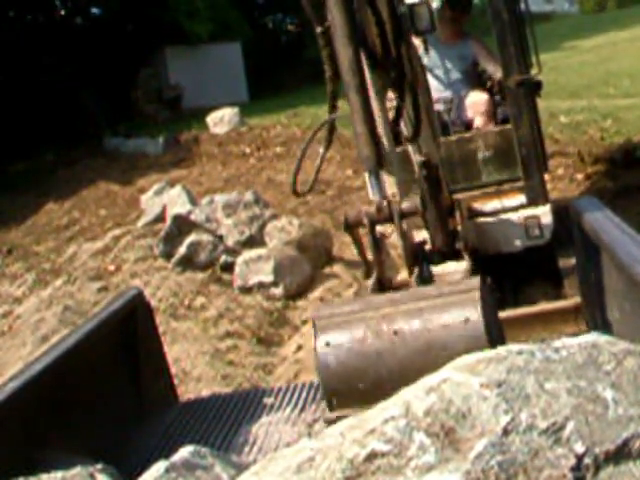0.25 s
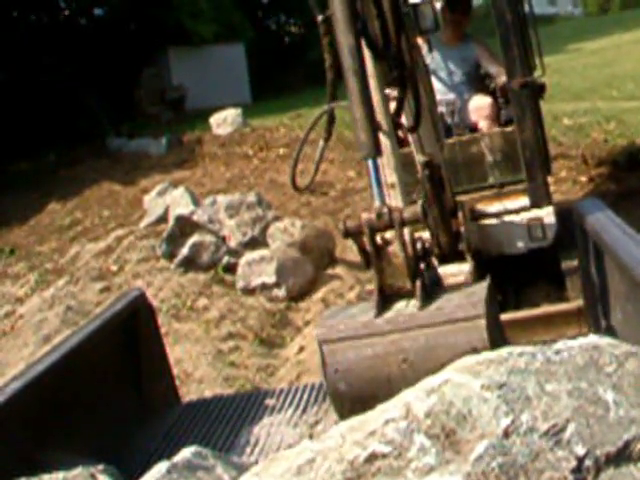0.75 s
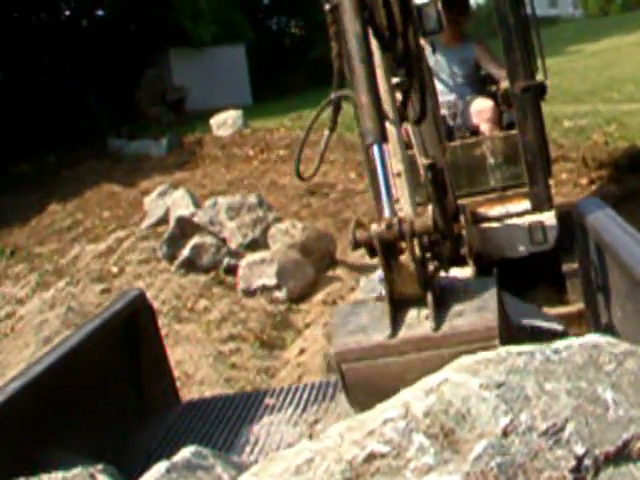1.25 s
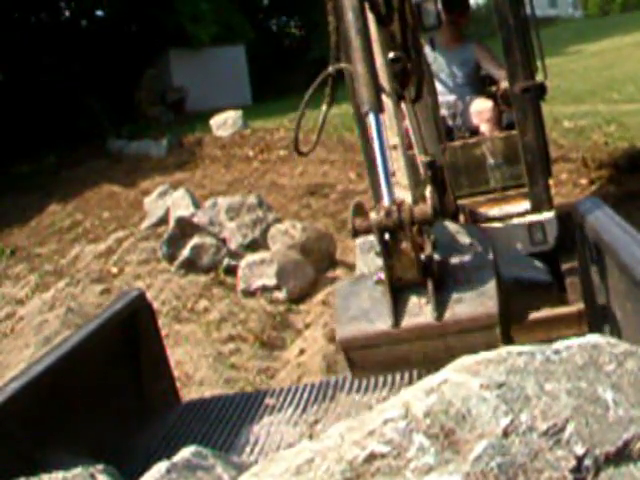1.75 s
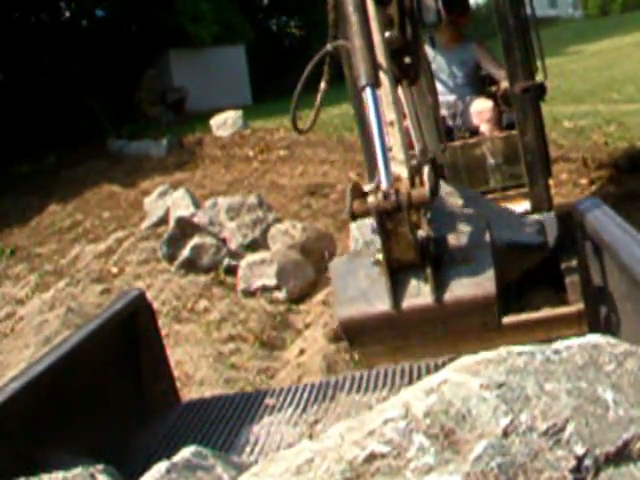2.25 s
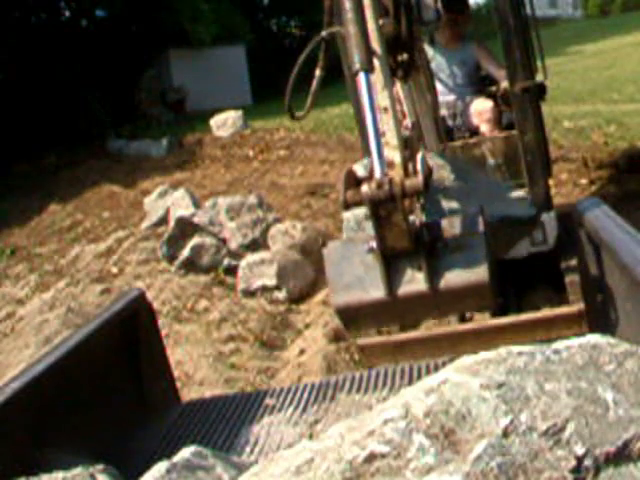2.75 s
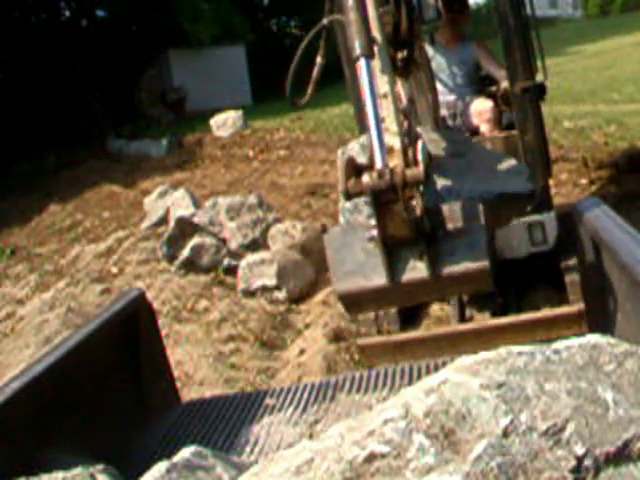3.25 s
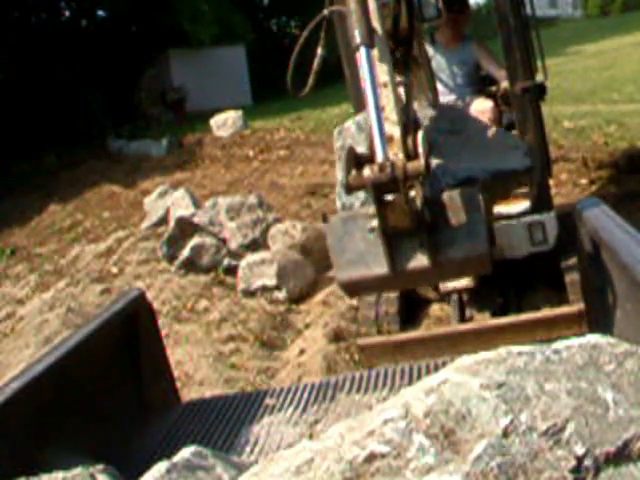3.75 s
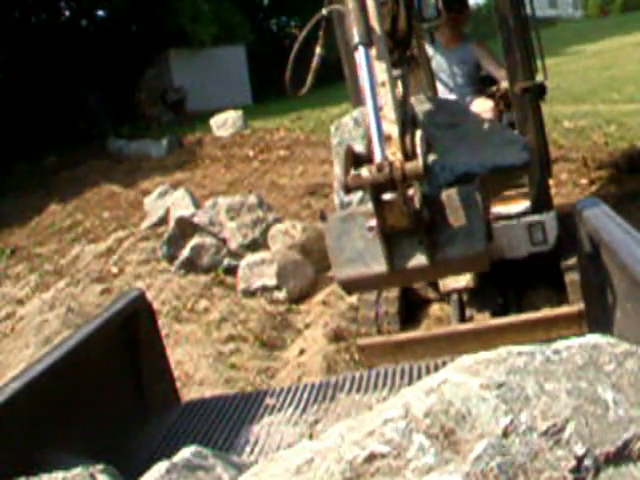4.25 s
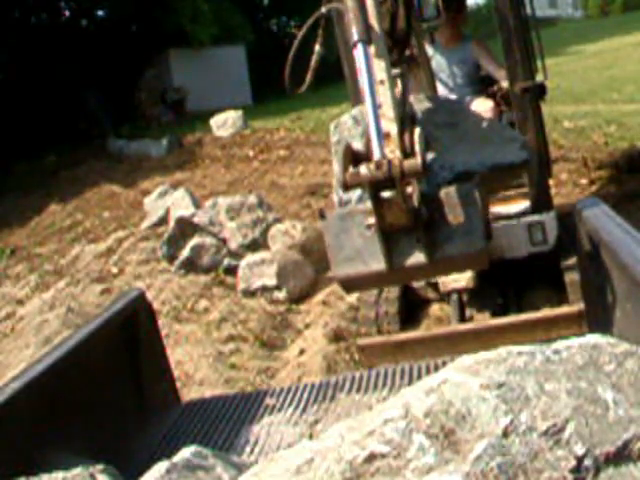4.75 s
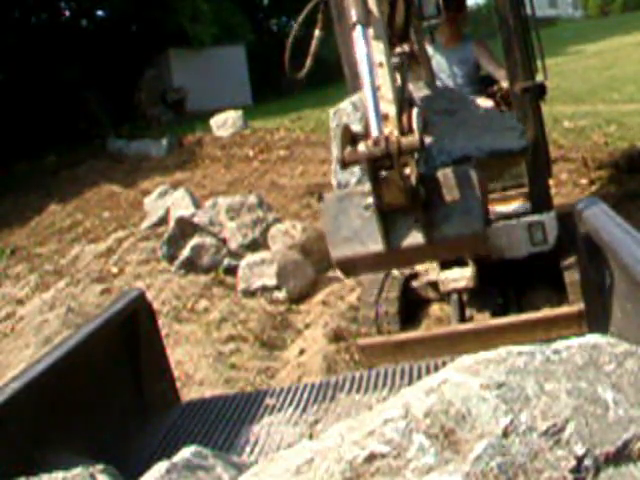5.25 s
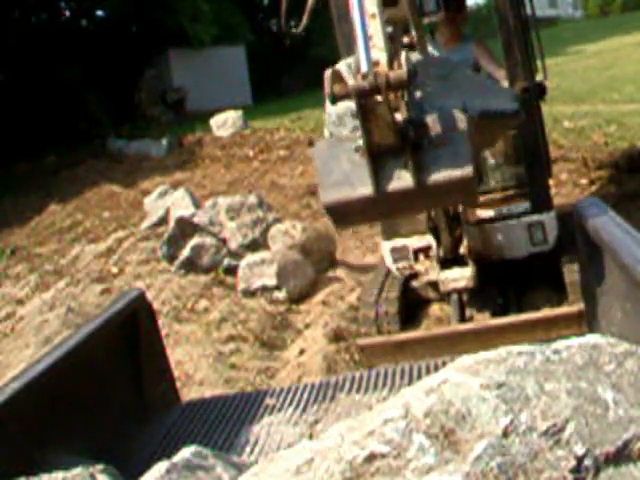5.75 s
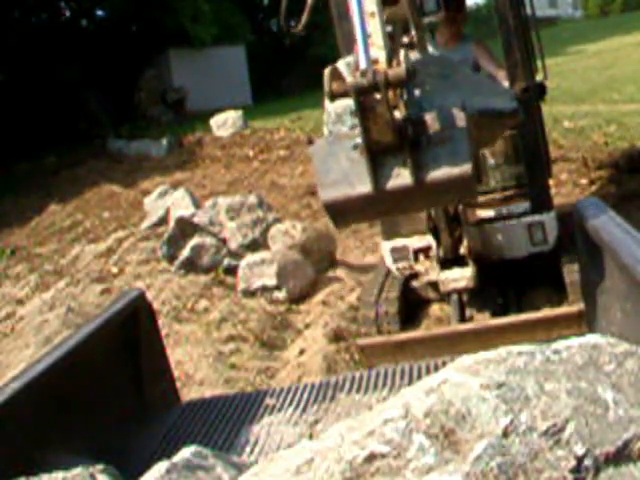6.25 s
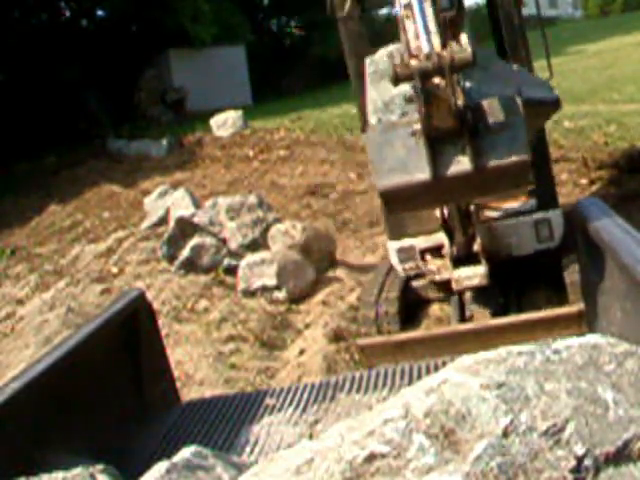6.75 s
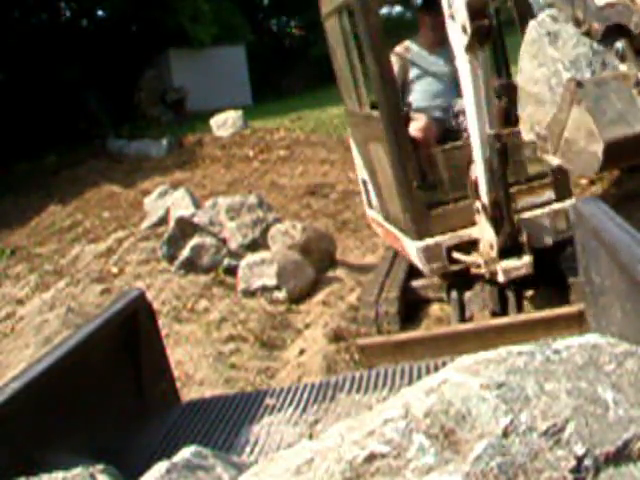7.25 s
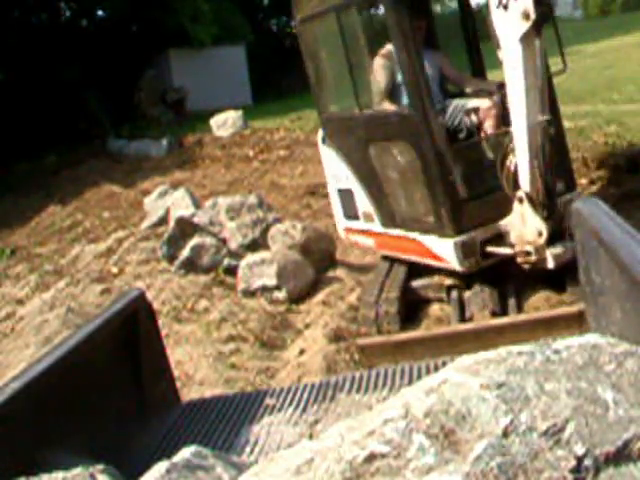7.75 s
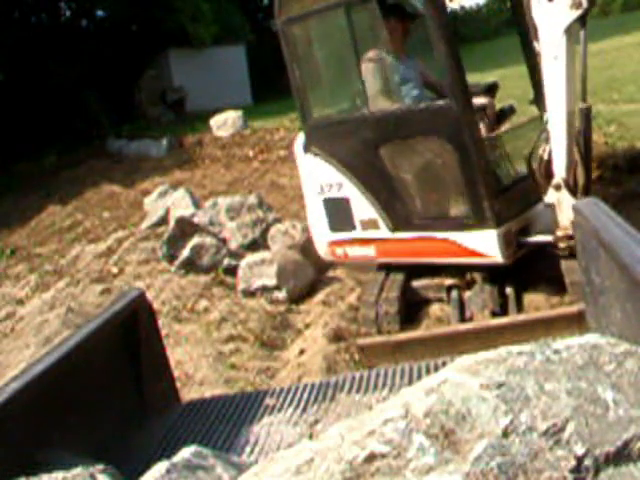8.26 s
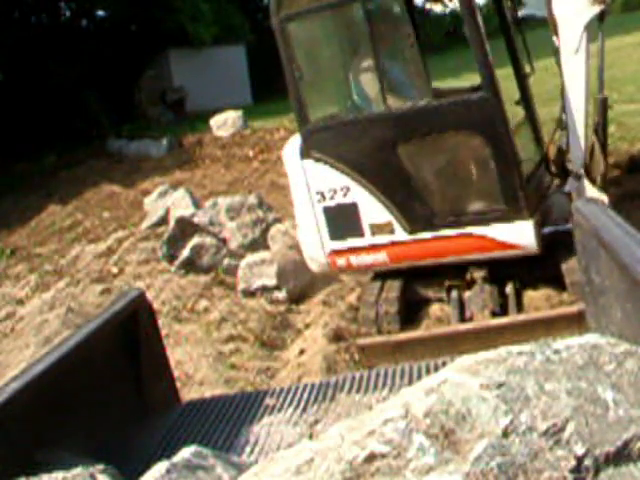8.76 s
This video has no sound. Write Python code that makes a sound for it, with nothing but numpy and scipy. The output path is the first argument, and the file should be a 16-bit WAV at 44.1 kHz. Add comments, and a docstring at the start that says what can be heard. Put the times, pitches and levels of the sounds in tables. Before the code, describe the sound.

A small excavator's diesel engine drones and clatters throughout, close by and outdoors. After a few faint taps, a boulder hits the steel bucket with one hard, ringing bang at about 0.3 seconds, followed by a quick cluster of clanks and stony cracks. The engine sounds briefly quieter after the bang and creeps back up. Lighter knocks come until about 1.8 seconds, over gritty grinding that fades by 4 seconds.

From about 1.5 seconds the engine sags under load as a hydraulic whine builds, joined by a high oil hiss around 2.5 seconds. A faint click comes just before 4 seconds. Then the whine and hiss drop away, and the engine speeds back up and runs steadily. From about 6.5 seconds the cab swings round, bringing stronger engine clatter, rattling sheet metal, and a fan's hum and rushing air until the end at 9 seconds.

```python
"""Mini excavator lifting a boulder.

Outdoors, close to a hand camera. The four-cylinder diesel sags as the hydraulic pump loads it, then
recovers. The cab swings round; each part grows loud as it faces the camera. The boulder grinds and
knocks in the steel bucket. One hard bang ducks the camera's gain, which creeps back over seconds."""
import sys
import numpy as np
from scipy import signal
from scipy.fft import rfft, irfft, next_fast_len
from scipy.io import wavfile
from scipy.ndimage import uniform_filter1d, minimum_filter1d

SR = 44100
rng = np.random.default_rng(int(sys.argv[2]) if len(sys.argv) > 2 else 0)


def digitize_waveform(pressure):
    """Quantize a signal to 16-bit integers and store it at the path in sys.argv[1].

    Rows of a 2-D input are taken as channels; values are limited to [-1, 1].
    """
    field = np.atleast_2d(pressure).T
    bounded = np.clip(field, -1, 1)
    quanta = np.round(bounded * 32767).astype(np.int16)
    wavfile.write(sys.argv[1], SR, quanta)


N = 397782
TIME_S = np.arange(N) / SR


def undb(db):
    """Decibels to gain."""
    return 10 ** (np.asarray(db) / 20)


def unit(x):
    """Scale to rms 1."""
    return x / np.sqrt(np.mean(x ** 2))


def curves(table):
    """Columns of a timed table, interpolated to every sample."""
    time_s, *columns = np.transpose(table)
    return [np.interp(TIME_S, time_s, column) for column in columns]


def colour(x, spectrum):
    """Filter by (freq_hz, gain_db) points."""
    size = next_fast_len(len(x))
    freq_hz, gain_db = np.transpose(spectrum)
    bins_hz = np.maximum(np.arange(size // 2 + 1) * SR / size, 1)
    gain = undb(np.interp(np.log(bins_hz), np.log(freq_hz), gain_db))
    return irfft(rfft(x, size) * gain, size)[:len(x)]


def noise(spectrum, size=N):
    """Coloured noise, rms 1."""
    return unit(colour(rng.standard_normal(size), spectrum))


def walk(rate_hz):
    """Slow random drift, rms 1: held steps smoothed twice."""
    hold = int(SR / rate_hz)
    steps = np.repeat(rng.standard_normal(N // hold + 1), hold)
    return unit(uniform_filter1d(uniform_filter1d(steps, hold), hold)[:N])


def tone(cycles, order, waver):
    """One order of a turning shaft, wavering in strength and phase."""
    phase = 2 * np.pi * order * cycles
    return np.sqrt(2) * ((1 + waver * walk(12)) * np.sin(phase) + waver * walk(12) * np.cos(phase))


def clicks(rate_per_s, scatter_db):
    """Clicks of random time and size; scatter makes a few much bigger."""
    impulses = (rng.random(N) < rate_per_s / SR) * rng.standard_normal(N)
    return impulses * undb(scatter_db * np.minimum(rng.exponential(size=N), 4))


def bursts(firings, depth, decay_firings, scatter_db, repeat):
    """Noise that surges at each firing; a share repeats with every cycle of the four cylinders."""
    points = 2048
    recurring = np.interp(firings / 4 % 1 * points, np.arange(points), rng.standard_normal(points))
    grain = np.sqrt(repeat) * recurring + np.sqrt(1 - repeat) * rng.standard_normal(N)
    strength = undb(scatter_db * rng.standard_normal(int(firings[-1]) + 1))[firings.astype(int)]
    return grain * (1 + depth * strength * np.exp(-(firings % 1) / decay_firings))


def covers(x):
    """Engine covers and boom resonate; ground and trailer walls comb the sound."""
    # steel resonances: freq_hz, width_hz, gain_db
    resonances = [(628, 23, 6), (763, 56, -4.5), (944, 97, -7), (1120, 87, -10), (1282, 23, -5.5),
                  (1540, 15, -10), (2100, 100, -12.5), (3285, 140, -3.5), (3760, 61, -6), (4650, 280, -10),
                  (5470, 50, -5), (5950, 130, -7), (7300, 91, 1)]
    # near reflections: delay_s, gain
    reflections = [(.0069, 0.17), (.0113, .22), (.0187, .18)]
    x = x + sum(undb(gain_db) * signal.lfilter(*signal.iirpeak(freq_hz, freq_hz / width_hz, fs=SR), x)
                for freq_hz, width_hz, gain_db in resonances)
    return x + sum(gain * np.interp(TIME_S - delay_s, TIME_S, x) for delay_s, gain in reflections)


def radiation(part, load, cab_deg):
    """Gain of one part: follows the load, and peaks or dips in a lobe of cab angle."""
    level_db, load_db, lobe_db, centre_deg, width_deg = part
    facing = np.exp(-((cab_deg - centre_deg) / width_deg) ** 2)
    return undb(level_db + load_db * load + lobe_db * facing)


def panels(load, cab_deg):
    """Loose sheet metal rattles as the side of the cab comes round."""
    # panel radiation: level_db, load_db, lobe_db, centre_deg, width_deg
    rattle_part = (-53, 1, 22, 52, 38)
    # loose panels: freq_hz, gain_db
    rattle_spectrum = [(380, -24), (490, 11), (640, -13.5), (800, -9.5), (980, 0.5), (1300, -3), (1650, -4),
                       (2300, -10), (4500, -37)]
    rattle = unit(colour(covers(clicks(rate_per_s=900, scatter_db=0)), rattle_spectrum))
    return radiation(rattle_part, load, cab_deg) * rattle


def fan(firings, load, cab_deg):
    """Belt-driven five-blade fan: blade tone, weaker orders and rushing air."""
    # blade tone directivity, shaded by the cab halfway round: cab_deg, gain_db
    blade_pattern = [(0, 0), (21, 2.5), (34, -1), (40, -7), (52, -5.5), (60, 6), (69, 6.5), (96, 4)]
    # weak fan orders: order, level_db
    hum_orders = [(2, -32.5), (4, -37.5), (6, -49), (7, -51.5)]
    # air rush: freq_hz, gain_db
    rush_spectrum = [(700, -22.5), (1400, 2), (1800, 0.5), (2350, 3), (2800, -7), (4000, -7), (5200, -10),
                     (6300, -11), (9000, -11.5)]
    # fan radiation: level_db, load_db, lobe_db, centre_deg, width_deg
    third_part = (-30, 2, 6, 59, 17)
    rush_part = (-41.5, 4, 14.5, 89, 54)
    turns_per_firing, blade_db, load_db = 0.8064, -21.5, -11
    turns = turns_per_firing * firings
    facing_db = np.interp(cab_deg, *np.transpose(blade_pattern))
    blades = undb(blade_db + load_db * load + facing_db) * tone(turns, order=5, waver=0.062)
    third = radiation(third_part, load, cab_deg) * tone(turns, order=3, waver=0.28)
    hum = sum(undb(db) * tone(turns, order, waver=0.17) for order, db in hum_orders)
    flutter = undb(0.5 * walk(14))
    air = bursts(firings, depth=0.12, decay_firings=0.37, scatter_db=2, repeat=0.04)
    rush = flutter * unit(colour(covers(air), rush_spectrum))
    return blades + hum + third + radiation(rush_part, load, cab_deg) * rush


def hydraulics(firings, load):
    """The pump whines until the lever is let go; oil hisses through the valve with a sinking band."""
    # weak pump orders, re the eighth: firing_order, level_db
    pump_orders = [(5, -8), (7, -12), (10, -13.5), (12, -26), (15, -14.5)]
    # flow through the control valve: time_s, level_db, pitch_hz
    valve = [(0, -69, 6600), (2.25, -44, 6600), (2.5, -34.5, 6513), (3, -39, 6058), (4.05, -46.5, 5930),
             (4.3, -69, 5670)]
    # oil hiss: freq_hz, gain_db
    oil_spectrum = [(1200, -23), (2800, -14.5), (5000, 4.5), (7200, 0), (8700, 1.5), (9600, 1.5),
                    (11000, 0.5)]
    whine_db, load_db = -35.5, 9
    release_start_s, release_s, drop_db = 4.04, 0.08, 18
    whine = tone(firings, order=8, waver=0.05) + undb(-3) * tone(firings, order=4, waver=0.05)
    whine += sum(undb(db) * tone(firings, order, waver=0.14) for order, db in pump_orders)
    released = np.clip((TIME_S - release_start_s) / release_s, 0, 1)
    whine *= undb(whine_db + load_db * load - drop_db * released)
    valve_db, valve_hz = curves(valve)
    turbulence = noise([(190, -1.5), (900, -23.5), (2500, -58.5)])
    jet = np.sqrt(2) * turbulence * np.sin(2 * np.pi * np.cumsum(valve_hz) / SR)
    return whine + undb(valve_db) * (noise(oil_spectrum) + undb(-5) * jet)


def diesel(firings, load, cab_deg):
    """The exhaust drones and puffs, the block clatters at each firing, the cab booms on order three."""
    # weak engine orders, re the firing tone: firing_order, level_db
    engine_orders = [(1.5, -19), (5, -24.5), (6, -15)]
    # exhaust and block noise: freq_hz, gain_db
    rumble_spectrum = [(20, -38.5), (32, -24.5), (45, -19), (60, -13.5), (90, -4.5), (115, 2), (180, 2.5),
                       (270, 0.5), (350, 0.5), (550, -6.5), (750, -27), (1500, -57)]
    clatter_spectrum = [(300, -27), (550, -4), (700, -1.5), (950, -1.5), (1150, -6.5), (1400, -8.5),
                        (2300, -21.5), (3000, -20), (7000, -26.5)]
    # engine radiation: level_db, load_db, lobe_db, centre_deg, width_deg
    drone_part = (-23, -2, -5.5, 58, 28.5)
    octave_part = (-27.5, 8.5, -6, 40, 19)
    boom_part = (-46, 1, 14.5, 44.5, 23)
    rumble_part = (-27.5, 3, 3, 63.5, 21.5)
    clatter_part = (-35.5, 2.5, 7.5, 68.5, 40)
    drone = tone(firings, order=1, waver=0.068)
    drone += sum(undb(db) * tone(firings, order, waver=0.079) for order, db in engine_orders)
    octave = tone(firings, order=2, waver=0.17)
    boom = tone(firings, order=3, waver=0.25)
    puffs = bursts(firings, depth=0.9, decay_firings=0.32, scatter_db=2, repeat=0.21)
    rumble = unit(colour(puffs, rumble_spectrum))
    combustion = bursts(firings, depth=1.3, decay_firings=0.35, scatter_db=1.8, repeat=0.15)
    clatter = unit(colour(covers(combustion), clatter_spectrum))
    layers = [(drone_part, drone), (octave_part, octave), (boom_part, boom),
              (rumble_part, rumble), (clatter_part, clatter)]
    return sum(radiation(part, load, cab_deg) * sound for part, sound in layers)


def grinding():
    """Grit crushed between boulder and bucket floor, fading as the rock settles."""
    # grinding strength: time_s, level_db
    envelope = [(0, -30.5), (.33, -29), (.37, -9), (.62, -22.5), (1.2, -21.5), (2.8, -26), (4.1, -37.5)]
    # grit on steel: freq_hz, gain_db
    grit_spectrum = [(250, -17), (500, -0.5), (900, -3), (1400, -9), (2300, -8.5), (3000, -18),
                     (7000, -20.5)]
    level_db, = curves(envelope)
    grit = clicks(rate_per_s=3000, scatter_db=2.5)
    return undb(level_db) * unit(colour(covers(grit), grit_spectrum))


def knocks():
    """Rock on steel: thud, clank and stony crack, then bucket ring. Hardness trades thud for crack."""
    # blows of the rock: start_s, level_db, hardness_db, t60_s, ring_hz
    blows = [(0.033, -27, -7, 0.097, 900), (.061, -21.5, 0.5, .07, 1200), (.121, -26.5, -10, 0.052, 900),
             (.141, -25.5, -7, 0.041, 900), (.275, -29.5, 0, 0.055, 1980), (.335, 12.5, 1, 0.12, 956),
             (.351, 5, -0.5, 0.18, 800), (.394, -0.5, 7.5, .065, 6700), (.419, -3, 0.5, 0.14, 800),
             (0.445, -3.5, 6, .07, 2300), (.466, -0.5, -9.5, 0.069, 1120), (.477, 5, 7, 0.1, 526),
             (.531, -8, 3.5, 0.072, 2000), (.593, -10.5, -1, 0.1, 790), (.647, -17.5, 7.5, 0.12, 2320),
             (.860, -12.5, -6.5, 0.3, 820), (1.049, -7, -9, 0.047, 900), (1.258, -15, -2.5, 0.36, 1230),
             (1.577, -18, -4.5, 0.15, 1262), (1.814, -15, 2, 0.073, 1520), (3.848, -24.5, 7, .04, 7550),
             (3.853, -23, -2.5, .06, 1600)]
    # steel bucket modes: freq_hz, level_db, t60_s
    bucket = [(590, -2, 0.59), (720, -5.5, 0.39), (820, -15, .25), (820, -7, 0.31), (915, -1, 0.12),
              (1002, 0.5, 0.14), (1040, -14, .28), (1253, 4.5, 0.083), (1610, 2, 0.11), (1900, -12, 0.21),
              (2020, -13, .29), (2200, -7, 0.13), (2500, -10, .35), (3700, -14, .17), (4700, -18, .3),
              (5560, -6, .3), (6700, 4, .1), (7060, -8, .08), (9300, 0, .07)]
    # impact noise: freq_hz, gain_db
    thud = [(60, -34), (200, 4), (350, 8), (500, 6.5), (800, -9), (2000, -55)]
    clank = [(300, -35.5), (700, 5), (1000, -1), (1500, -5), (2300, -3.5), (3200, -14), (6000, -39)]
    crack = [(1200, -44.5), (2700, 0.5), (4000, 7), (6000, 4), (9000, 2), (14000, -7)]
    thud_db, crack_db, ring_db = -4.5, -4, -2  # re the clank
    attack_s, tail_s, onset_samples = 0.00075, 0.084, SR // 80
    out = np.zeros(N + SR)
    age_s = np.arange(SR) / SR
    mode_hz, mode_db, mode_t60_s = np.transpose(bucket)
    modes = np.sin(2 * np.pi * mode_hz[:, None] * age_s) * 1000 ** (-age_s / mode_t60_s[:, None])
    attack = 1 - np.exp(-age_s / attack_s)
    tail = undb(-22) * np.exp(-age_s / tail_s)  # scatter off ground and trailer
    for start_s, level_db, hardness_db, t60_s, ring_hz in blows:
        envelope = attack * (1000 ** (-age_s / t60_s) + tail)
        impact = 0
        for spectrum, db in (thud, thud_db - hardness_db), (clank, 0), (crack, crack_db + hardness_db):
            burst = noise(spectrum, size=SR) * envelope
            impact += undb(db) * burst / np.std(burst[:onset_samples])
        weights = undb(mode_db - 17 * np.abs(np.log2(mode_hz / ring_hz)))  # favour modes near ring_hz
        ring = undb(ring_db) * np.sqrt(2) * weights @ modes / np.linalg.norm(weights)
        start = int(start_s * SR)
        out[start:start + SR] += undb(level_db) * (impact + ring)
    return out[:N]


def scene():
    """Engine, pump and fan follow the crankshaft; load and cab angle set the machine's balance."""
    # engine speed: time_s, firing_hz
    speed = [(0, 80.26), (0.4, 80.96), (0.75, 78.06), (1.5, 77.6), (2.4, 73.9), (3.5, 73.52), (4.09, 73.46),
             (4.3, 82.8), (4.65, 81.1), (4.9, 80.6), (6, 80.18), (6.45, 81.07), (6.95, 79.3), (7.6, 81.68),
             (7.95, 79.7), (8.35, 81.55), (9.02, 80.2)]
    # pump effort as the bucket curls: time_s, load_fraction
    pump_load = [(0, 0.3), (.7, 0.07), (1.5, 0.42), (2.4, .72), (3.6, 1), (4.07, 0.74), (4.27, 0)]
    swing_start_s, swing_deg_per_s = 6.4, 32.8
    firing_hz, = curves(speed)
    firings = np.cumsum(firing_hz * (1 + 0.001 * walk(10))) / SR
    load, = curves(pump_load)
    cab_deg = swing_deg_per_s * np.maximum(TIME_S - swing_start_s, 0)
    machine = diesel(firings, load, cab_deg) + hydraulics(firings, load)
    machine += fan(firings, load, cab_deg) + panels(load, cab_deg)
    return (machine + knocks() + grinding())[None]


def gain_control(x):
    """Gain drops at once above the threshold, holds, then returns at a steady dB rate."""
    threshold_db, detector_s, hold_s, release_db_per_s = -10.5, 0.0027, 0.57, 8
    pole = np.exp(-1 / (detector_s * SR))
    level_db = 10 * np.log10(signal.lfilter([1 - pole], [1, -pole], x ** 2) + 1e-12)
    half_hold = int(hold_s * SR / 2)
    held_db = -minimum_filter1d(-level_db, 2 * half_hold + 1, origin=half_hold, mode="nearest")
    excess_db = np.maximum(held_db - threshold_db, 0)
    recovery_db = release_db_per_s * TIME_S
    cut_db = np.maximum.accumulate(excess_db + recovery_db) - recovery_db
    return x * undb(-cut_db)


def record(dry):
    """Camera: gain control, self-noise, dull treble and rounded overloads."""
    # camera hiss and microphone response: freq_hz, gain_db
    hiss_spectrum = [(200, 5), (1000, 6), (2400, 4.5), (3200, 2), (16000, -0.5)]
    microphone = [(20, 0.5), (6500, -0.5), (7500, -6.5), (8800, -13), (9800, -24), (10600, -37),
                  (16000, -47)]
    hiss_db, ceiling, cutoff_hz = -45.5, 0.72, 15700
    x = colour(gain_control(dry[0]) + undb(hiss_db) * noise(hiss_spectrum), microphone)
    x = x / (1 + (x / ceiling) ** 6) ** (1 / 6)
    lowpass = signal.ellip(8, 0.2, 70, cutoff_hz, fs=SR, output="sos")
    return signal.sosfilt(lowpass, x)[None]


dry = scene()
out = record(dry)
digitize_waveform(out)
```